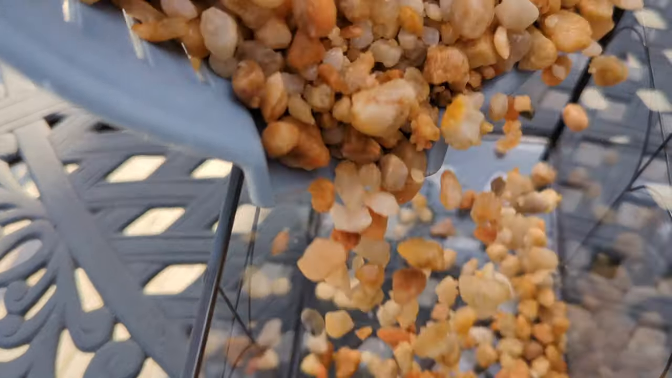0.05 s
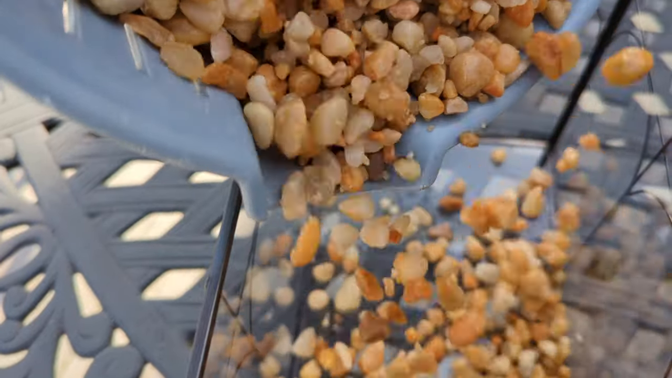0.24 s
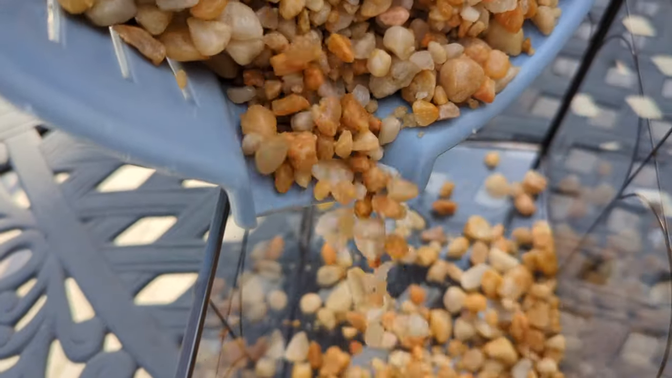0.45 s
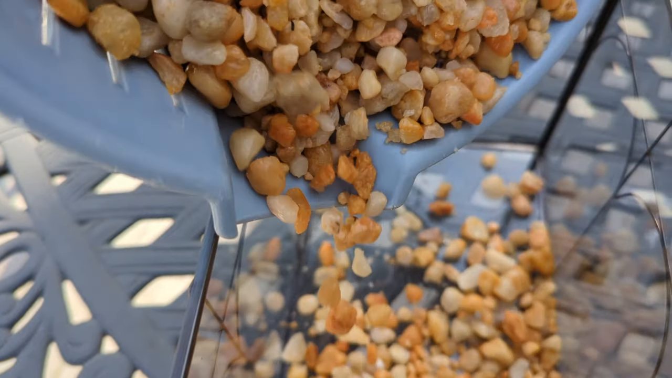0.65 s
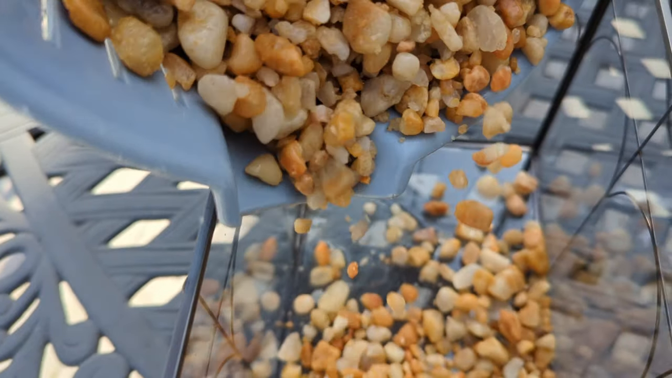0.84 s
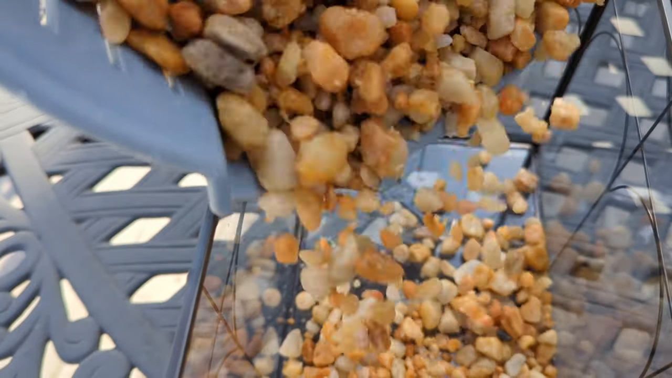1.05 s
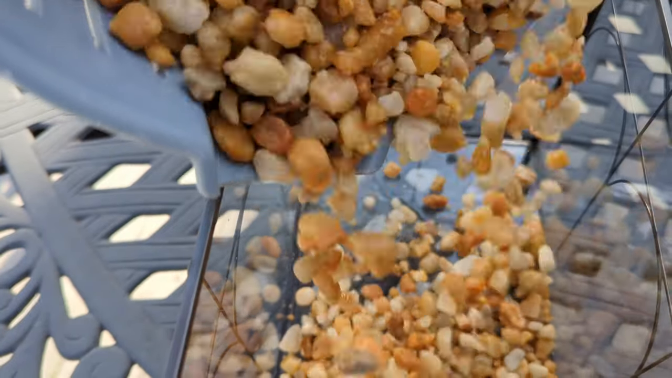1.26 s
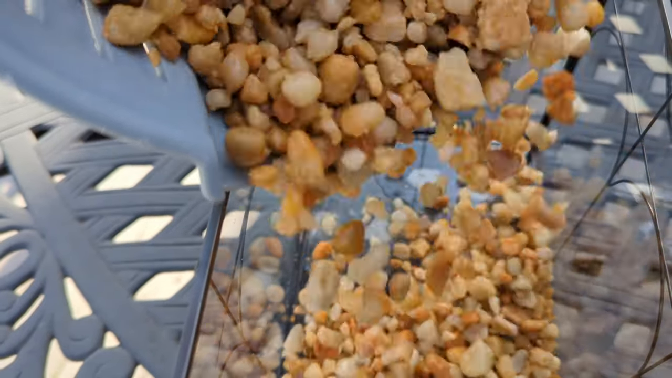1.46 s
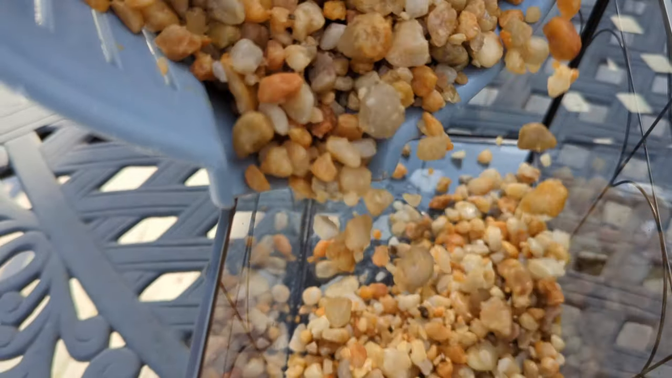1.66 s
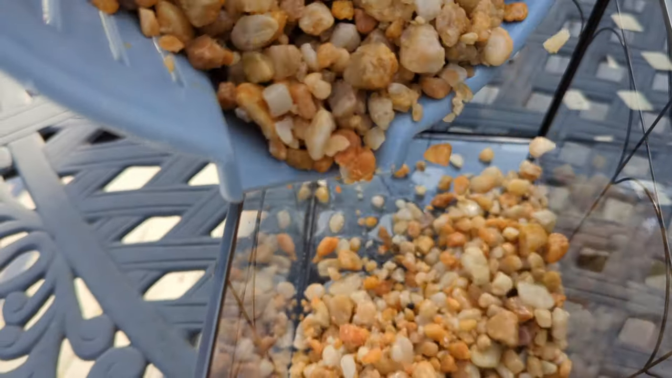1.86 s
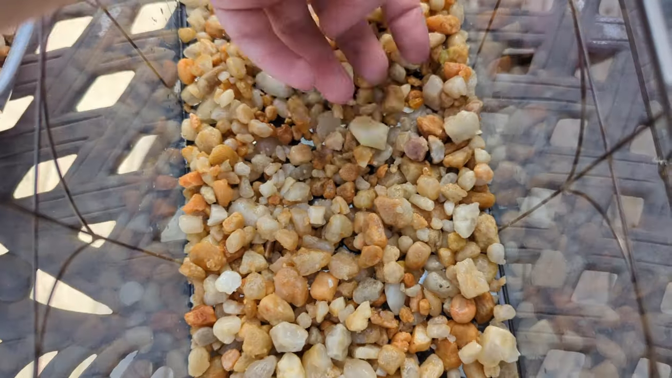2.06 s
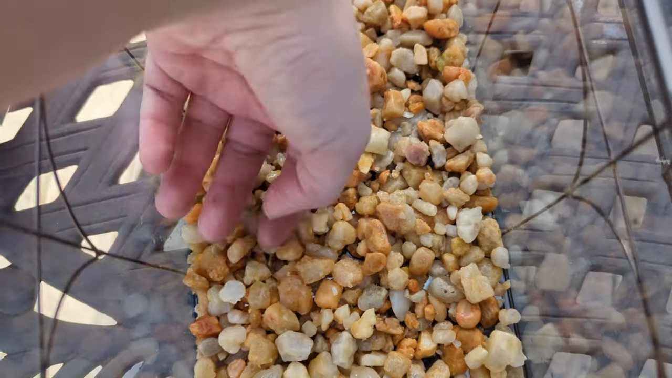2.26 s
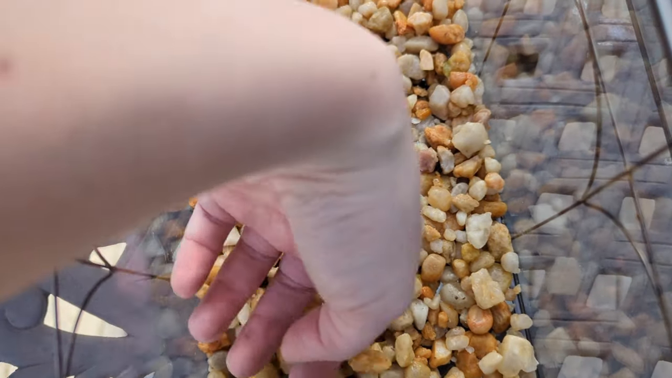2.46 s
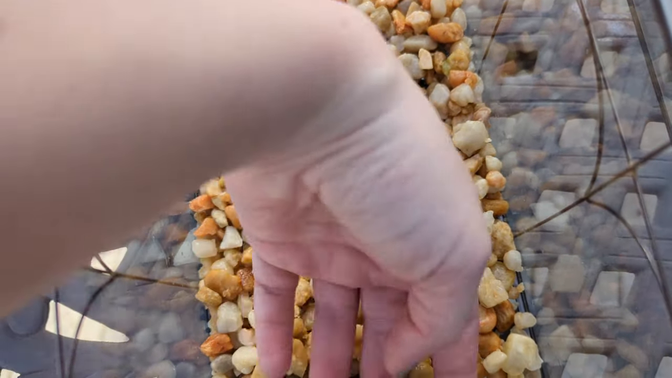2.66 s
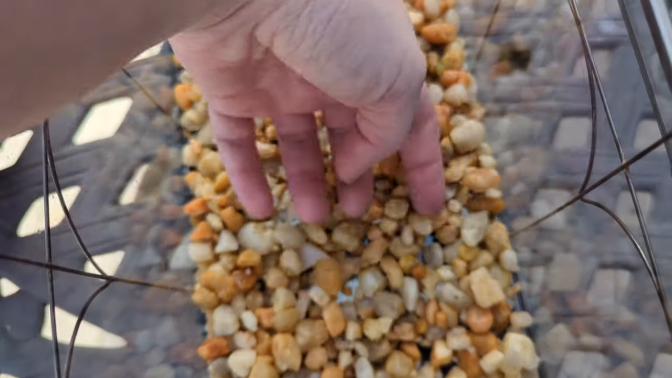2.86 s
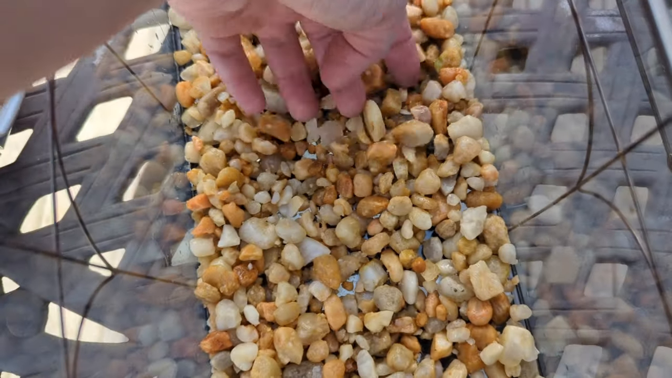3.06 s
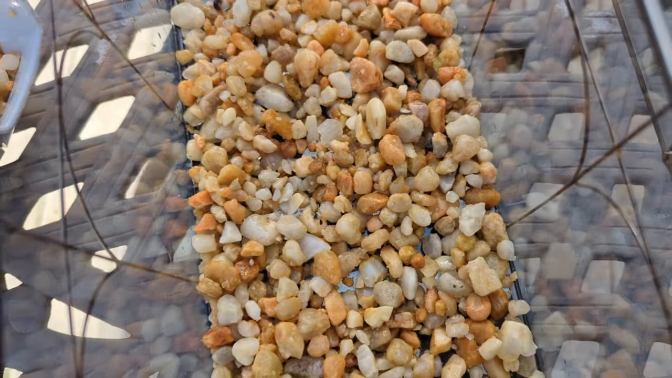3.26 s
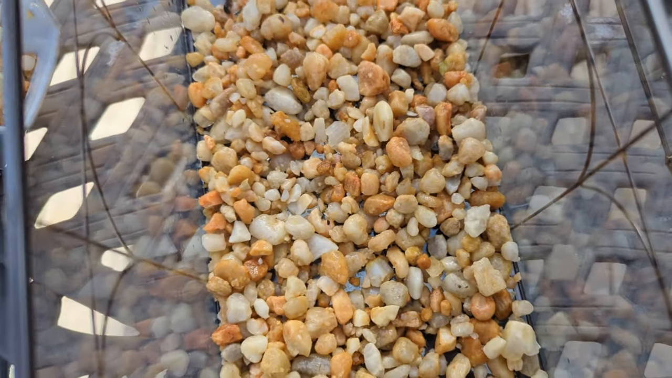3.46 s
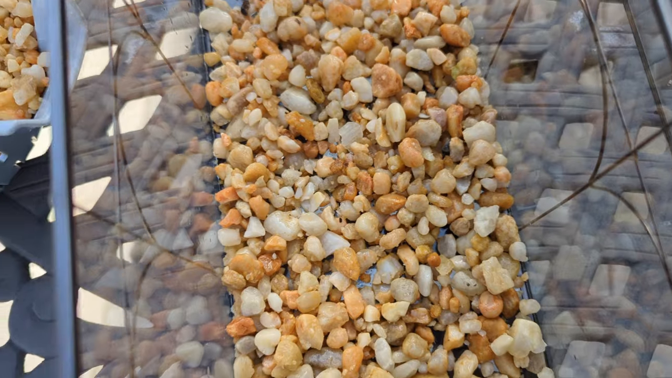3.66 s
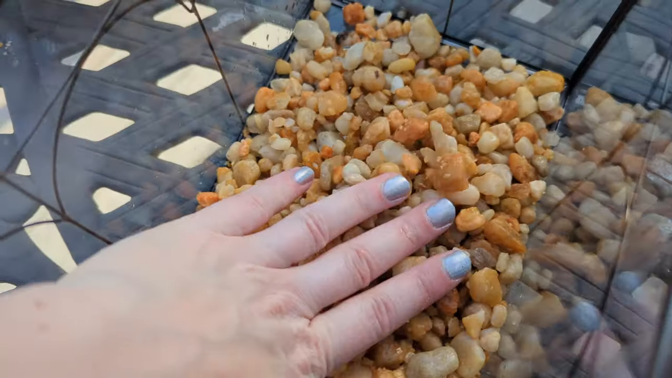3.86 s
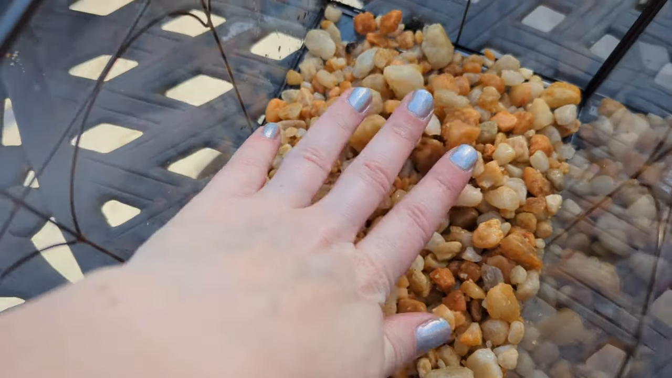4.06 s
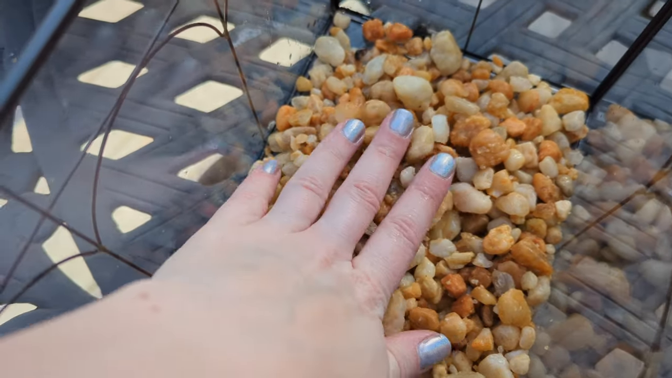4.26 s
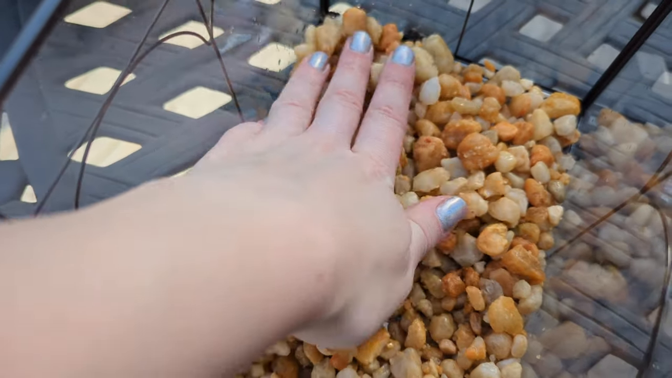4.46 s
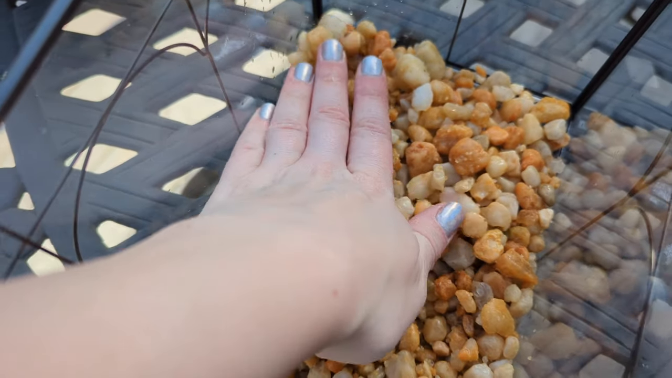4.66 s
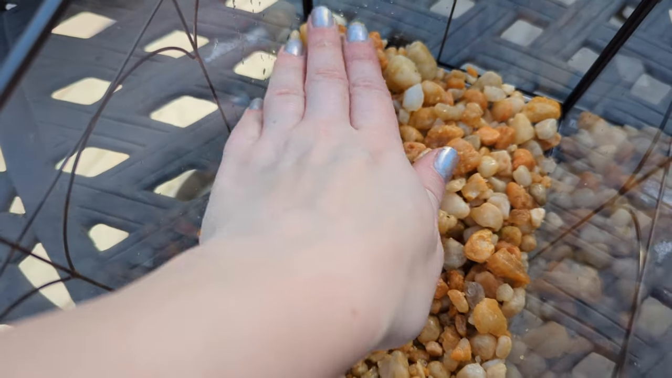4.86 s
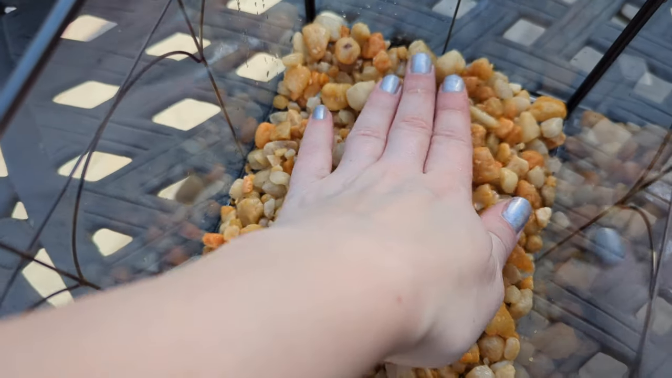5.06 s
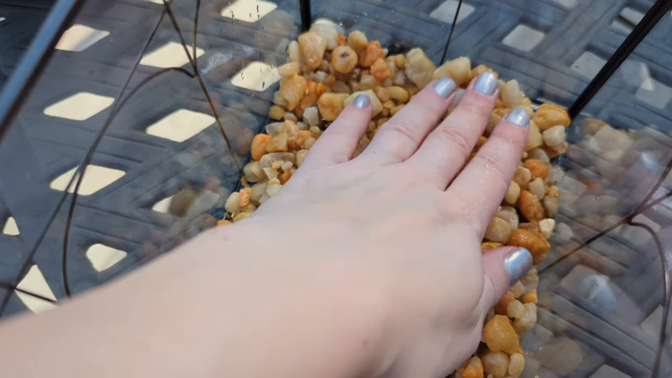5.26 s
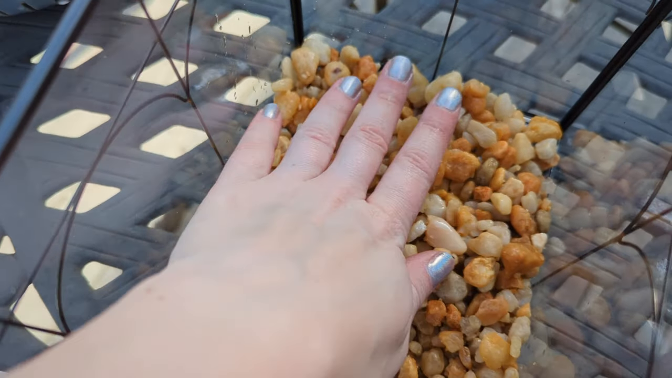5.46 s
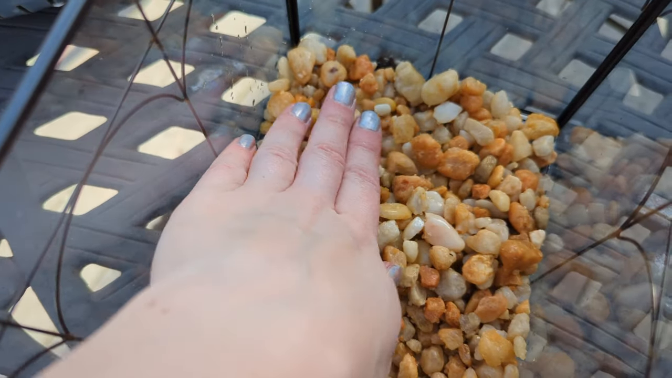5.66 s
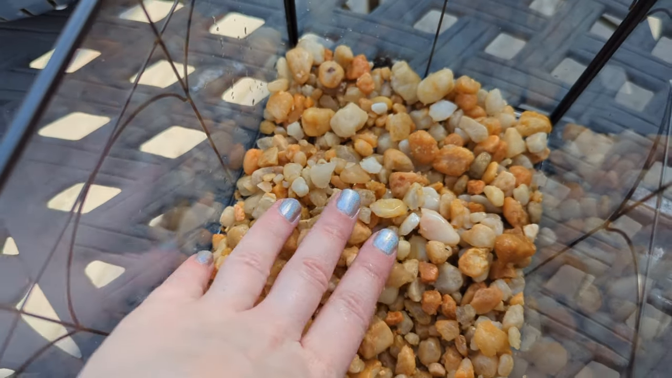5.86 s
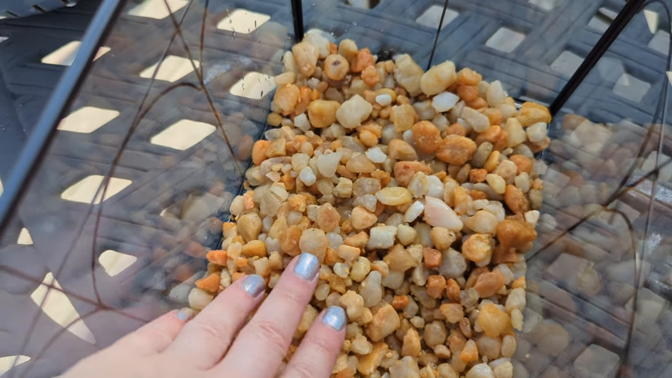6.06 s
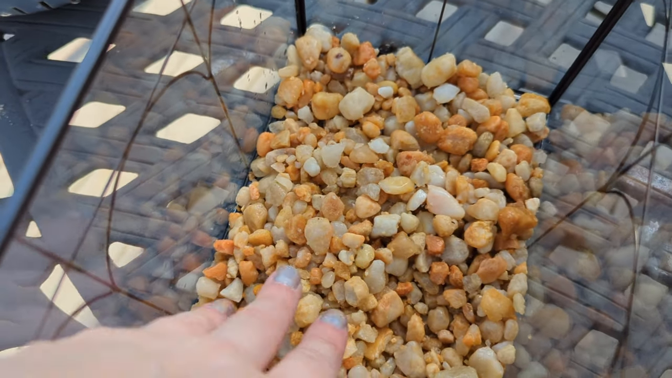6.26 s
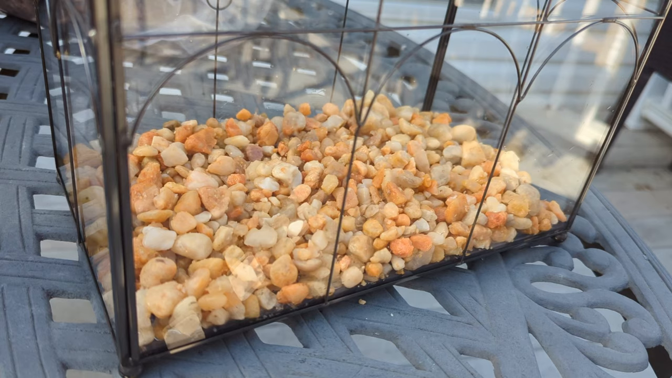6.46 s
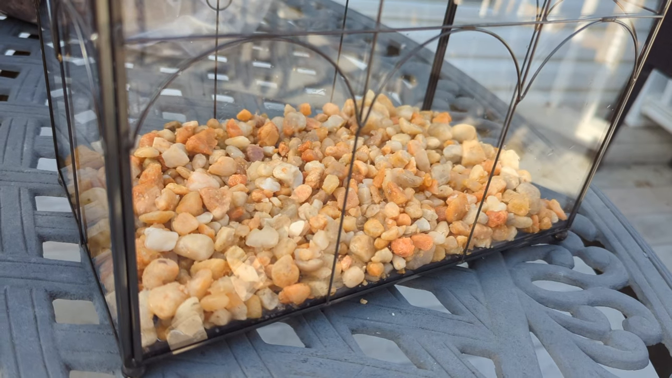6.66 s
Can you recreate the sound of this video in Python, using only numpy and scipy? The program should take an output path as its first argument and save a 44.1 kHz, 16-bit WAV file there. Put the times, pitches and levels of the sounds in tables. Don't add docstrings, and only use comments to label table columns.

```python
import sys
import numpy as np
from scipy import signal
from scipy.fft import rfft, irfft, next_fast_len
from scipy.io import wavfile
from scipy.ndimage import uniform_filter1d, minimum_filter1d

SR = 44100
rng = np.random.default_rng(int(sys.argv[2]) if len(sys.argv) > 2 else 0)


def store_wav(level_fs):
    pcm = np.round(np.clip(np.atleast_2d(level_fs), -1, 1) * 32767)
    wavfile.write(sys.argv[1], SR, pcm.T.astype(np.int16))


def decibels_to_gain(level_db):
    exponent = np.asarray(level_db, float) / 20
    return 10 ** exponent


N = 296352
TIME = np.arange(N) / SR

RAKE_FROM_S, COMB_S, PALM_S, TIPS_S, LIFT_S, LAST_SHOT_S = 1.97, 2.35, (3.812, 6.25), 5.86, 6.33, 6.535

# frequency in Hz, density in dB per Hz.
HUSH = [(15, -48.5), (25, -18), (78, -1), (384, -19.5), (463, -4.5), (545, -20.5), (818, -22),
        (2050, -30.5), (2690, -23.5), (5730, -41), (8140, -32), (13200, -43), (16000, -48.5)]
LAST_HUSH = [(24, -34), (40, -7), (124, 5), (189, -15.5), (467, -5.5), (542, -11), (3930, -9), (16000, -16)]
HUSH_DB, LAST_HUSH_DB = -59.5, -78

# time in seconds, pitch in Hz, level in dB.
BIRD_CALLS = [
    [(3.6, 7850, -88), (3.63, 8150, -73), (3.7, 8700, -73), (3.74, 8850, -88)],
    [(6.478, 2900, -72), (6.49, 2800, -64), (6.52, 2500, -64), (6.535, 2400, -82)],
    [(6.47, 4000, -78), (6.49, 3950, -72), (6.535, 3900, -84)],
    [(6.59, 4300, -98), (6.62, 3800, -82), (6.65, 3200, -88), (6.69, 2200, -84), (6.715, 2150, -90)],
]

# frequency in Hz, width in Hz, level in dB.
TABLE_MODES = [(62, 53, -0.5), (132.5, 106, 5.5)]

# start in seconds, frequency in Hz, peak in dB, swell in seconds, decay by 60 dB in seconds.
SOFT_NUDGES = [(3.471, 360, -29, .007, .065), (3.468, 1310, -49, .004, .043), (3.47, 146, -44, .011, .1),
               (4.611, 215, -31, .004, .12), (5.232, 215, -25, .0094, .1), (6.385, 358, -37, .032, .12),
               (6.39, 1230, -57, .022, .1), (2.56, 52, -44, .05, .3), (3.17, 47, -52, .05, .3),
               (4.72, 50, -42, .028, .35), (4.0, 62, -41, .03, .25), (.02, 105, -43, .03, .15),
               (2.93, 70, -45, .03, .2), (4.46, 110, -44, .02, .12)]

# frequency in Hz, width in Hz, level in dB.
EMPTY_TANK_MODES = [(220.5, 18, -10.5), (325.7, 69, -4.5), (378.4, 91, 1), (459, 24, -6)]
BEDDED_TANK_MODES = [(232, 72, -7.5), (298.3, 23, -8.5), (367, 83, 2), (440, 31.8, 2.5)]

# frequency in Hz, density in dB per Hz.
POUR_TICK_COLOUR = [(1650, -32), (2800, -6), (3560, -7), (4210, -6.5), (5280, 2), (5980, -2.5), (6520, 3),
                    (7330, -2.5), (8060, 1.5), (9960, -7), (11700, -1.5), (12400, -9), (13500, -7),
                    (15000, -10), (16000, -39.5)]
POUR_KNOCK_COLOUR = [(330, -47.5), (560, -12), (697, -19), (801, 0), (906, -10), (1200, -7.5), (1450, 4),
                     (1660, -3), (1990, 0), (2240, 2), (3200, -22), (4160, -44.5), (7040, -120)]
RAKE_TICK_COLOUR = [(1650, -12), (2800, -23), (3360, -1.5), (4030, -4.5), (5720, 0), (6620, 0.5),
                    (7330, -3.5), (8300, -4), (9820, -11.5), (11300, -8.5), (13500, -13), (15100, -16),
                    (16000, -39)]
RAKE_KNOCK_COLOUR = [(330, -46.5), (560, -8), (620, -13), (750, -1), (861, -6.5), (1100, -4), (1290, -3),
                     (1660, -3.5), (2360, 0), (2850, -3), (3200, -12), (4160, -54.5), (7040, -120)]

# time in seconds, tick peak in dB.
GLASS_LANDINGS = [(0.5145, 6.5), (0.585, -20), (0.615, -5.5), (.637, -3), (0.6671, -4.5), (0.6796, 7.5),
                  (.704, -7.5), (0.745, -9), (.7605, -4), (0.7803, -4), (0.8176, -6), (0.842, -11.5),
                  (0.8719, -3.5), (0.9234, -0.5), (0.9633, -0.5), (1.0118, -4.5), (1.04, 15.5), (1.074, -2),
                  (1.0919, -3), (1.137, -4), (1.1945, 9.5), (1.207, -8), (1.2431, 5.5), (1.361, -1),
                  (1.7537, -3), (1.78, 3.5), (1.828, 10), (1.86, -9.5), (1.8931, 2.5), (1.935, -12.5)]
LANDING_KNOCK_DB = -22

# time in seconds, tick peak in dB, knock minus tick in dB.
HAND_STONES = [(2.3573, -19.5, -17.5), (2.3827, 5, -36.5), (2.556, -31, 1), (2.7822, -28, 8),
               (2.8663, -9, -3), (2.9118, -11.5, -15), (2.953, -6, -11.5), (3.0365, -24.5, -19),
               (3.0686, -21.5, -15), (3.1145, -26.5, -13.5), (3.1312, -0.5, -30), (3.8166, -19, -6),
               (4.308, -24.5, -17), (4.582, -15.5, -25), (4.613, -17.5, -5), (4.6496, -22.5, -10.5),
               (4.6946, -25, -13), (4.7117, -19, 2), (4.86, -21, -25), (5.036, -13.5, 2), (5.154, 1, -24.5),
               (5.357, -19.5, -24), (5.364, -13.5, -23), (5.4617, -16.5, -5), (5.626, -22, -0.5),
               (5.8018, -19, 2), (5.82, -27, -4), (5.8372, -24, -5), (5.879, -27, -9)]
STRAY_STONES = [(2.1021, -48, -15), (2.166, -20, -20), (2.1892, -26.5, -10), (2.2574, -30, -15),
                (2.2894, -34, -8), (2.5844, -33, -21), (2.664, -39, -17), (2.6962, -28.5, -17),
                (2.7414, -49, -2), (2.7642, -40, -8), (3.3187, -40, -6), (3.3336, -45, -4),
                (3.3744, -58, 2), (3.4645, -43, -8), (3.4987, -51, -14), (3.7244, -57.5, 3),
                (4.923, -25, -11), (4.941, -36, -2), (5.2807, -23.5, -23), (5.5471, -22, -10.5),
                (6.2168, -44, -16), (6.2294, -39, -13), (6.2597, -39, -13), (6.2834, -33.5, -11.5),
                (6.3285, -52.5, -5), (6.4672, -48, 5.5)]

# time in seconds, flow in dB.
COLANDER_FLOW = [
    (0, -13),
    (.45, -15),
    (.6, -21.5),
    (.85, -24.5),
    (1.12, -21.5),
    (1.22, -16),
    (1.76, -14.5),
    (1.81, -23),
    (1.96, -20.5),
]

# start in seconds, attack in seconds, hold in seconds, level in dB, release in dB per s.
HAND_SWEEPS = [(1.946, 0.066, 0.013, -15.5, 207), (2.356, 0.05, 0.096, -19, 223),
               (2.774, 0.024, 0.11, -17.5, 171), (3.096, 0.026, 0.0085, -23, 250),
               (3.106, 0.015, 0.08, -24.5, 457), (3.805, 0.059, 0.21, -21, 185),
               (4.307, 0.13, 0.083, -18, 300), (4.573, 0.011, 0.025, -35.5, 132),
               (4.697, .016, 0.022, -31.5, 150), (4.757, 0.049, 0.029, -32.5, 185),
               (4.997, 0.037, .15, -24.5, 337), (5.35, 0.02, 0.096, -28, 400),
               (5.609, 0.018, 0.016, -30, 208), (5.704, 0.012, 0.021, -37.5, 330),
               (5.866, .02, 0.0214, -23.5, 277), (5.946, .02, 0.017, -45.5, 124),
               (6.092, 0.037, 0.012, -35.5, 270), (6.349, 0.038, 0.026, -50.5, 350)]

# knock under tick in dB, thump under tick in dB, spread of sizes in dB,
# table shaking in dB, all at full flow.
ACTION_STAGES = [
    (-15.5, -21, 3, -55),
    (-6, -13.5, 0, -47.5),
    (-8, -12.5, 2, -45),
    (-2.5, -9.5, -0.5, -48),
    (-6, -14, -1, -51),
    (-17, -11.5, -2, -44),
]

HITS_PER_S, PLACES = 900, 10
TICK_DELAY = 24

# frequency in Hz, left minus right in dB.
PORT_DIFFERENCE = [(60, 8.5), (110, -2.5), (200, 3), (380, -0.5), (700, 2.5), (1290, 5), (2380, 3.5),
                   (4400, -4), (8120, -3), (15000, 6)]


def unit(x):
    return x / np.sqrt(np.mean(x ** 2))


def colour(x, points):
    hz, db = np.transpose(points)
    grid = np.fft.rfftfreq(2048, 1 / SR)
    outline_db = np.interp(np.log(grid + 1), np.log(hz + 1), db)
    cepstrum = irfft(np.log(decibels_to_gain(outline_db)))
    cepstrum[1:1024] *= 2
    cepstrum[1025:] = 0
    taps = irfft(np.exp(rfft(cepstrum)))[:1024]
    taps = taps / np.sqrt(np.sum(taps ** 2))
    return signal.oaconvolve(x, taps[None], axes=1)[:, :x.shape[1]]


def ring(x, modes):
    total, power = 0, 0
    for hz, width, db in modes:
        section = np.concatenate(signal.iirpeak(hz, hz / width, fs=SR))
        total = total + decibels_to_gain(db) * signal.sosfilt(np.tile(section, (2, 1)), x)
        power += decibels_to_gain(db) ** 2 * width * np.pi / 2 / SR
    return total / np.sqrt(power)


def walk(rate):
    k = int(SR / rate)
    held = np.repeat(rng.standard_normal(N // k + 1), k)
    return unit(uniform_filter1d(held, k)[:N])


def rumble_cut(x, hz, order=2):
    return signal.sosfilt(signal.butter(order, hz, "high", fs=SR, output="sos"), x)


def by_stage(shape, x, pouring, raking):
    late = TIME > RAKE_FROM_S
    return shape(x * ~late, pouring) + shape(x * late, raking)


def air():
    noise = rng.standard_normal((2, N))
    before = decibels_to_gain(HUSH_DB) * colour(noise, HUSH)
    after = decibels_to_gain(LAST_HUSH_DB) * colour(noise, LAST_HUSH)
    mid, side = np.where(TIME < LAST_SHOT_S, before, after)
    side = rumble_cut(side, 300, order=1)
    return decibels_to_gain(2.3 * walk(2.0)) * np.array([mid + side, mid - side])


def birds():
    out = np.zeros(N)
    for call in BIRD_CALLS:
        s, hz, db = np.transpose(call)
        pitch = np.interp(TIME, s, hz) + 70 * walk(300)
        level_db = np.interp(TIME, s, db, -200, -200)
        out += decibels_to_gain(level_db + 3.5 * walk(80)) * np.sin(2 * np.pi * np.cumsum(pitch) / SR)
    return out


def flow():
    rest_db, onset_db = -75.5, 25.5
    power = decibels_to_gain(np.interp(TIME, *np.transpose(COLANDER_FLOW), right=-200)) ** 2 + decibels_to_gain(rest_db) ** 2
    palm_from, palm_to = PALM_S
    creak_db = -51 - 1.5 * (TIME - palm_from)
    power = power + decibels_to_gain(creak_db) ** 2 * (TIME > palm_from) * (TIME < palm_to)
    for s, attack, hold, db, release in HAND_SWEEPS:
        span = slice(int(s * SR), int(s * SR) + SR)
        t = TIME[span] - s
        rise = np.clip(1 - t / attack, 0, 1)
        fall = np.clip(t - attack - hold, 0, 1)
        power[span] += decibels_to_gain(db - onset_db * rise ** 2 - release * fall) ** 2
    return 10 * np.log10(power)


def stage():
    now = np.array(ACTION_STAGES)[np.searchsorted([RAKE_FROM_S, COMB_S, PALM_S[0], TIPS_S, LIFT_S], TIME)].T
    full_db = -17
    short = np.clip(full_db - flow(), -5, 40)
    return now + np.array([[0.24], [0.33], [0.11], [-0.43]]) * short


def table():
    shared, own = rng.standard_normal(N), rng.standard_normal((2, N))
    shaking_db = uniform_filter1d(stage()[-1], size=2000) + 3.5 * walk(12)
    return decibels_to_gain(shaking_db) * rumble_cut(ring(shared + 0.54 * own, TABLE_MODES), 42)


def nudges():
    out = np.zeros(N)
    for s, hz, db, swell, t60 in SOFT_NUDGES:
        t = np.clip(TIME - s, 0, None)
        rise = np.sin(np.pi / 2 * np.clip(t / swell, 0, 1)) ** 2
        decay = decibels_to_gain(db - 60 * np.clip(t - swell, 0, 2) / t60)
        out += rise * decay * np.sin(2 * np.pi * hz * t)
    return out


def panes(count, t60, echo_db, tint_db):
    n = np.arange(2048)
    hz = np.fft.rfftfreq(len(n), 1 / SR)
    together = 0.41 * hz ** 2 / (hz ** 2 + 3500 ** 2)
    out = []
    for _ in range(count):
        shared, own = rng.standard_normal(len(n)), rng.standard_normal((2, len(n)))
        lag = 10.18 + 3.52 * rng.standard_normal()
        rattle = decibels_to_gain(echo_db - 60 * n / SR / t60) * (n > 30)
        common = rattle * shared + (n == TICK_DELAY)
        delay = np.sqrt(1 - together ** 2) * np.exp(-2j * np.pi * lag * hz / SR)
        late = irfft(rfft(common) * (delay + together))
        balance_db = 0.96 * rng.standard_normal() * np.array([[.5], [-.5]])
        pair = (np.array([common, late]) + 0.52 * rattle * own) * decibels_to_gain(balance_db)
        tint = zip(400 * 2 ** np.arange(0, 5.6, .8), tint_db * rng.uniform(-1, 1, 7))
        pair = colour(pair, list(tint))
        out.append(pair / np.sqrt(np.sum(pair ** 2) / 2))
    return out


def scatter(seconds, sizes, place, space):
    train = np.zeros((PLACES, N))
    at = np.clip((seconds * SR).astype(int) - TICK_DELAY, 0, N - 1)
    np.add.at(train, (place, at), sizes)
    size = next_fast_len(N + 4096)
    spectrum = sum(rfft(train[k], size) * rfft(space[k], size) for k in range(PLACES))
    return irfft(spectrum, size)[:, :N], train.sum(axis=0)


def overlap(tick, knock):
    tick_outline = [(800, -45), (1900, tick[1][1] - 16)] + tick[1:]
    knock_outline = knock[:-2] + [(4800, knock[-3][1] - 13), (10000, -45)]
    return tick_outline, knock_outline


def tick_and_knock(tick_push, knock_push):
    pour_tick, pour_knock = overlap(POUR_TICK_COLOUR, POUR_KNOCK_COLOUR)
    rake_tick, rake_knock = overlap(RAKE_TICK_COLOUR, RAKE_KNOCK_COLOUR)
    tick = by_stage(colour, tick_push, pour_tick, rake_tick)
    return tick, by_stage(colour, knock_push, pour_knock, rake_knock)


def stones(space):
    landings = [(*row, LANDING_KNOCK_DB) for row in GLASS_LANDINGS]
    s, db, knock_db = np.transpose(sorted(landings + HAND_STONES + STRAY_STONES))
    place, gap, rebound = rng.random((len(s), 3)).T
    seconds = np.concatenate([s, s + 0.0012 + 0.0037 * gap])
    where = np.tile(((place + (s > RAKE_FROM_S)) * PLACES / 2).astype(int), 2)
    bounce = np.concatenate([np.ones(len(s)), decibels_to_gain(1.0 - 6.2 * rebound)])
    wet, push = scatter(seconds, bounce * decibels_to_gain(np.tile(db, 2)), where, space)
    latest = np.clip(np.searchsorted(s, TIME + .001) - 1, 0, len(s) - 1)
    tick, knock = tick_and_knock(wet, wet * decibels_to_gain(knock_db[latest] + 19))
    thump = by_stage(ring, push, EMPTY_TANK_MODES, BEDDED_TANK_MODES)
    return decibels_to_gain(13.0) * tick + knock + decibels_to_gain(-13.0) * thump


def gravel(space):
    db, (knock_db, thump_db, spread_db, _) = flow(), stage()
    count = int(HITS_PER_S * N / SR)
    when, place, sign = rng.random((count, 3)).T
    at = (when * N).astype(int)
    spread = np.log(decibels_to_gain(spread_db[at]))
    sizes = np.exp(spread * np.clip(rng.standard_normal(count), -3, 2.8) - spread ** 2)
    slides = walk(90)
    slide_db = np.where(TIME < PALM_S[0], 1.51, 0.96) * slides
    sizes = sizes * decibels_to_gain(slide_db)[at] * np.sign(sign - .5)
    wet, push = scatter(at / SR, sizes * np.sqrt(SR / HITS_PER_S), (place * PLACES).astype(int), space)
    tick, knock = tick_and_knock(wet, wet)
    lumps_db = 3.5 * unit(uniform_filter1d(slides, size=1200))
    thump = by_stage(ring, (push + wet) * decibels_to_gain(lumps_db), EMPTY_TANK_MODES, BEDDED_TANK_MODES)
    boom_db = 2.5 * TIME * (TIME < RAKE_FROM_S)
    return decibels_to_gain(db - 0.5) * (tick + decibels_to_gain(knock_db) * knock + decibels_to_gain(thump_db - 4.0 + boom_db) * thump)


def scene():
    space = panes(count=PLACES, t60=0.037, echo_db=-16, tint_db=3.0)
    bare = panes(count=PLACES // 2, t60=0.016, echo_db=-14, tint_db=4.5)
    bedded = panes(count=PLACES // 2, t60=0.033, echo_db=-23, tint_db=1.0)
    glass = rumble_cut(gravel(space) + stones(bare + bedded), 110)
    before_cut = np.clip((LAST_SHOT_S - TIME) / 0.0125, 0, 1)
    return (glass + nudges() + table()) * before_cut + air() + birds()


def low_pass(x):
    return signal.sosfilt(signal.butter(12, 17010, fs=SR, output="sos"), x)


def record(dry):
    hz, db = np.transpose(PORT_DIFFERENCE)
    tilt = decibels_to_gain(np.interp(np.log(np.fft.rfftfreq(N, 1 / SR) + 1), np.log(hz), db) / 2)
    ports = irfft(rfft(dry) * np.array([tilt, 1 / tilt]), N)
    cut = signal.sosfilt(signal.ellip(8, .2, 60, 15900, fs=SR, output="sos"), ports)
    headroom = np.minimum(1, .93 / (np.abs(cut).max(axis=0) + 1e-9))
    gain = uniform_filter1d(minimum_filter1d(headroom, size=129), size=65)
    return low_pass(cut * gain)


dry = scene()
out = record(dry)
store_wav(out)
```